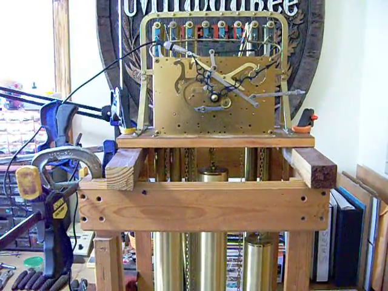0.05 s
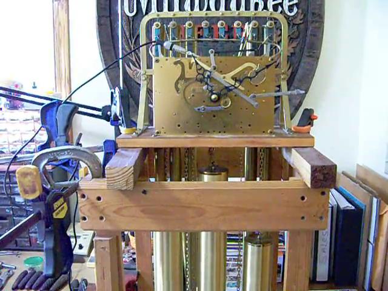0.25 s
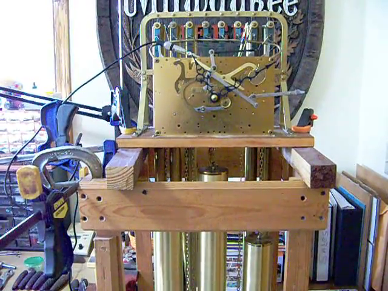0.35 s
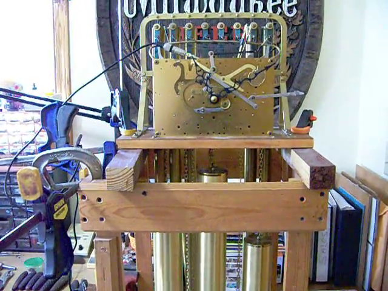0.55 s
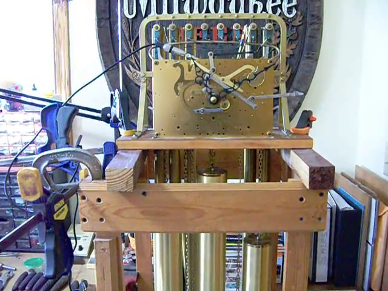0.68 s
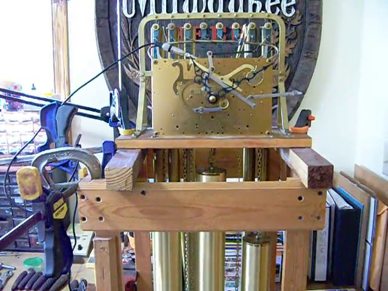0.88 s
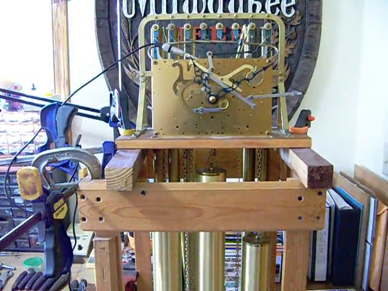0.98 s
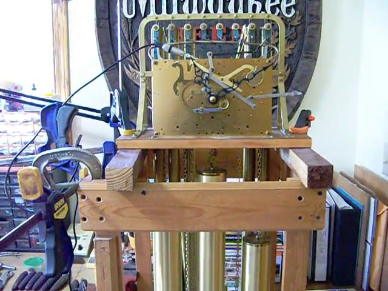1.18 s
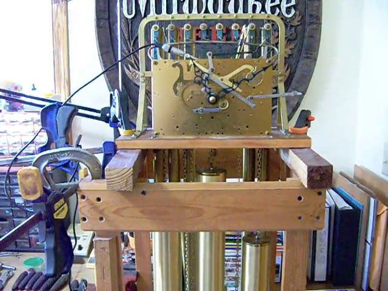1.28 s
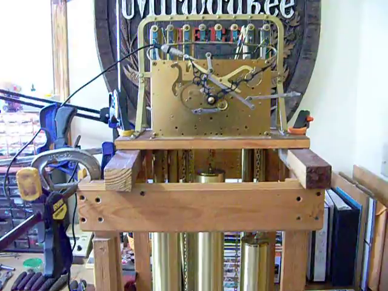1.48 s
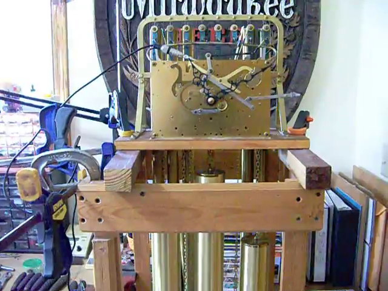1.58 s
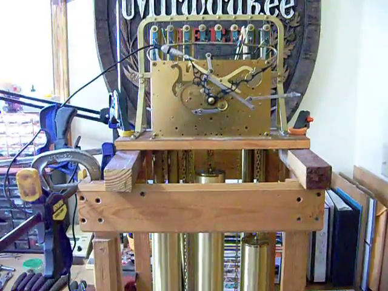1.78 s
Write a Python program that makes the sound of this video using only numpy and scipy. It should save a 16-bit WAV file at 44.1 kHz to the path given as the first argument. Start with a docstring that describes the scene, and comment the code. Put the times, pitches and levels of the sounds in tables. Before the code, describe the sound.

A brass clock mechanism ticks slowly, twice. A sharp metallic tick comes at about 0.2 seconds, and a slightly softer tock at about 1.1 seconds. Each has a bright ping, a brief ring and a faint dull knock from the wooden stand, fading in the room within about a third of a second. Low rumble, soft hiss and a very faint hum continue throughout in the quiet workshop.

```python
"""Brass clock movement in a quiet workshop.

The weight-driven escape wheel drops on each pallet in turn: a tick, then a softer tock.
Each beat pings, rings the brass briefly and knocks faintly in the wooden stand.
Room reflections swell and fade, over low rumble, hiss and a faint hum."""
import sys
import numpy as np
from scipy import signal
from scipy.io import wavfile

SR = 44100
rng = np.random.default_rng(int(sys.argv[2]) if len(sys.argv) > 2 else 0)


def log_audio(samples):
    """Write samples as a 16-bit WAV file to the path given in sys.argv[1]."""
    # one column per channel
    frames = np.atleast_2d(samples).T
    # limit to full scale, then quantise
    limited = np.clip(frames, -1, 1)
    pcm = np.round(limited * 32767).astype(np.int16)
    wavfile.write(sys.argv[1], SR, pcm)


N = 81585
T = np.arange(N) / SR
EARLY_T60_S = 0.12   # first reflections


def from_db(db):
    """Decibels to gain."""
    return 10 ** (np.asarray(db) / 20)


def noise_bands(spectrum, count, column=1):
    """Log-spaced noise bands following a spectrum: centres [Hz], bands summing to unit rms."""
    table = np.array(spectrum, float)
    edges = np.geomspace(table[0, 0], table[-1, 0], count + 1)
    centres = np.sqrt(edges[:-1] * edges[1:])
    gains = from_db(np.interp(np.log(centres), np.log(table[:, 0]), table[:, column]))
    bands = np.zeros((count, N))
    for i, gain in enumerate(gains):
        bandpass = signal.butter(2, edges[i:i + 2], "band", fs=SR, output="sos")
        bands[i] = gain * signal.sosfilt(bandpass, rng.standard_normal(N + SR // 2))[-N:]
    return centres, bands / bands.sum(0).std()


def waver(depth_rms=0.3, rate_hz=32.5):
    """Random amplitude wobble of a mode under overlapping reflections."""
    pole = np.exp(-2 * np.pi * rate_hz / SR)
    wobble = signal.lfilter([1], [1, -2 * pole, pole * pole], rng.standard_normal(N))
    return depth_rms * wobble / np.sqrt(np.mean(wobble ** 2))


def envelope(start_s, swell_s, hold_s, t60_s, early_share=0):
    """Swell as reflections gather; decay from hold_s after the start, the early share faster."""
    age_s = T - start_s
    swell = np.clip(age_s / swell_s, 0, 1) ** 0.88
    fade_s = np.maximum(age_s - hold_s, 0)
    early = early_share * from_db(-60 * fade_s / EARLY_T60_S)
    tail = (1 - early_share) * from_db(-60 * fade_s / t60_s)
    return swell * (early + tail)


# Rumble and hiss: (frequency [Hz], relative density [dB])
AIR_SPECTRUM = [(12, -34), (20, 2.5), (86, -2), (135, -6), (169, -7.5), (314, -13), (422, -17),
                (502, -17.5), (934, -20.5), (1010, -23), (1460, -24.5), (7500, -31), (9750, -57.5),
                (16500, -120)]
# Background swell: (time [s], relative level [dB])
AIR_SWELL = [(0, 0), (.3, 1.5), (.55, -0.3), (1.0, -0.6), (1.3, 1.1), (1.47, 2.5), (1.85, 1.85)]
# Steady hum: (frequency [Hz], rms level [dB])
HUM_TONES = [(419.9, -79), (958.2, -79)]


def workshop(air_db=-57.5, hiss_top_hz=7900):
    """Slightly swelling rumble and hiss, plus faint hum."""
    _, bands = noise_bands(AIR_SPECTRUM, count=56)
    lowpass = signal.butter(14, hiss_top_hz, fs=SR, output="sos")
    air = signal.sosfilt(lowpass, bands.sum(0))
    swell_db = np.interp(T, *np.transpose(AIR_SWELL))
    hum = sum(from_db(db) * np.sqrt(2) * np.sin(2 * np.pi * (hz * T + rng.random()))
              for hz, db in HUM_TONES)
    return from_db(air_db + swell_db) * air + hum


# Stand: (frequency [Hz], relative density at pallet 0 [dB], at pallet 1 [dB])
STAND_SPECTRUM = [(327, -10.5, -20), (540, 6.5, 4.5), (670, 10, 1.5), (870, 3.5, -5), (1030, -9.5, -18.5),
                  (1130, 3, -1.5), (1350, 6, 5.5), (1520, -6.5, -6.5), (1697, -1, -10)]


def stand_knock(start_s, pallet, swell_s):
    """Dull response of the wooden stand to a beat."""
    _, bands = noise_bands(STAND_SPECTRUM, count=18, column=1 + pallet)
    return bands.sum(0) * envelope(start_s, swell_s, hold_s=0.05, t60_s=0.25)


# Plates and wheels: (frequency [Hz], relative density at pallet 0 [dB], at pallet 1 [dB])
CLACK_SPECTRUM = [(1746, -3, -11.5), (2050, 8, 3), (2450, 7.5, 8), (2780, 6, 5.5), (3067, 12, 18.5),
                  (3180, 4.5, 1), (3660, 16.5, 12), (4070, 7, 9), (4360, -4, 0), (5700, 5, -0.5),
                  (6200, -9.5, -2.5), (7370, 0.5, -5.5), (8000, -37, -24), (8600, -15.5, -21),
                  (8905, -30.5, -37)]
# Clack tail in the room: (frequency [Hz], T60 [s])
CLACK_DECAY = [(2000, 0.35), (3000, 0.34), (4000, 0.3), (5800, 0.34), (7500, .22), (9000, 0.22)]


def metal_clack(start_s, pallet, swell_s, hold_s):
    """Dense upper metal modes blurred by the room; the tail loses treble first."""
    centres_hz, bands = noise_bands(CLACK_SPECTRUM, count=32, column=1 + pallet)
    band_t60_s = np.interp(centres_hz, *np.transpose(CLACK_DECAY))
    return sum(band * envelope(start_s, swell_s, hold_s, t60_s, early_share=0.19)
               for band, t60_s in zip(bands, band_t60_s))


# Ping, one row per pallet: (frequency [Hz], level [dB], swell [s], hold [s])
PALLET_PINGS = [(3005, -38.5, 0.017, 0.044), (2937, -35, 0.0064, .015)]


def escapement_ping(start_s, pallet):
    """The escapement's own bright, quickly damped note."""
    hz, db, swell_s, hold_s = PALLET_PINGS[pallet]
    tone = (1 + waver()) * np.sin(2 * np.pi * (hz * T + rng.random()))
    return from_db(db) * tone * envelope(start_s, swell_s, hold_s, t60_s=0.05)


# Brass modes: (frequency [Hz])
BRASS_HZ = [642, 865, 942, 1506, 1973, 2004, 2250, 2406, 2535, 2601, 2830, 2895, 2938, 2956, 3118, 3218,
            3470, 3645, 3727, 3893, 4284, 4441, 5327, 5918]
# Excitation, one row per pallet, one column per mode: (level [dB])
BRASS_DB = [
    [-52, -52, -62.5, -46.5, -47, -45.5, -48.5, -62, -48, -42.5, -39.5, -37.5, -43, -26, -40, -42, -47,
     -47.5, -38, -45, -55.5, -49, -49.5, -50.5],
    [-49, -56.5, -54, -55, -49, -48, -50, -51, -43.5, -49, -39.5, -47, -36, -49, -59, -64.5, -50.5, -44.5,
     -46.5, -57, -49.5, -63, -53, -65],
]
# Decay per mode: (T60 [s])
BRASS_T60_S = [0.24, 0.17, 0.53, 0.24, 0.43, 0.41, .28, 0.2, 0.22, 0.36, 0.47, 0.36, 0.36, 0.31, 0.34, 0.33,
               0.35, 0.37, .27, 0.17, 0.25, 0.39, .21, 0.34]


def brass_ring(start_s, pallet):
    """Distinct modes of the movement; each pallet excites its own mix."""
    swell_s, hold_s, early_share = (0.018, 0.034, 0.52) if pallet == 0 else (0.015, 0.015, 0.15)
    ring = np.zeros(N)
    for hz, db, t60_s in zip(BRASS_HZ, BRASS_DB[pallet], BRASS_T60_S):
        phase = 2 * np.pi * (hz * T + rng.random())
        tone = (1 + waver()) * np.sin(phase) + waver() * np.cos(phase)
        ring += from_db(db) * tone * envelope(start_s, swell_s, hold_s, t60_s, early_share)
    return ring


# Wheel landings: (time [s], pallet [0 or 1], clack [dB], knock [dB], swell [s], clack hold [s])
PALLET_DROPS = [(0.2359, 0, -35, -50, 0.0086, 0.02), (1.0829, 1, -38, -53, 0.0065, 0.016)]


def scene():
    """Tick and tock over the workshop background, mono."""
    mix = workshop()
    for start_s, pallet, clack_db, knock_db, swell_s, hold_s in PALLET_DROPS:
        mix += brass_ring(start_s, pallet)
        mix += from_db(clack_db) * metal_clack(start_s, pallet, swell_s, hold_s)
        mix += from_db(knock_db) * stand_knock(start_s, pallet, swell_s)
        mix += escapement_ping(start_s, pallet)
    return mix[None]


def record(dry):
    """Steep treble cut."""
    stopband_hz, rejection_db = 9350, 60
    lowpass = signal.cheby2(18, rejection_db, stopband_hz, fs=SR, output="sos")
    return signal.sosfilt(lowpass, dry)


dry = scene()
out = record(dry)
log_audio(out)
```